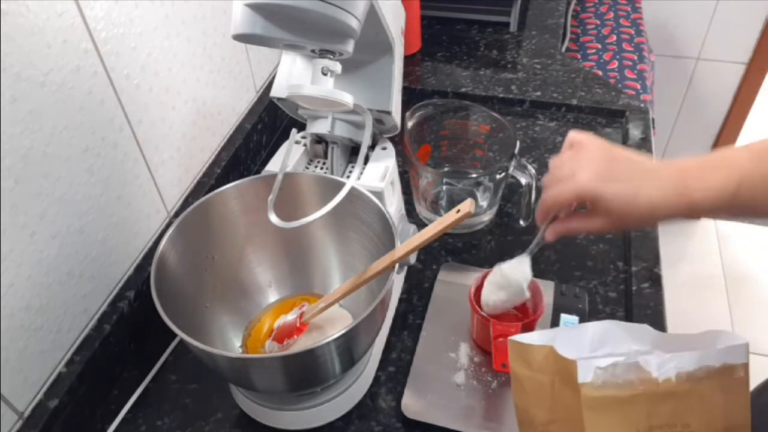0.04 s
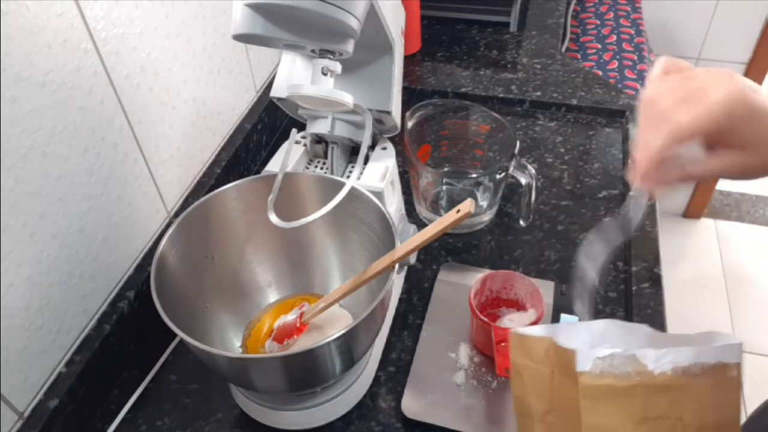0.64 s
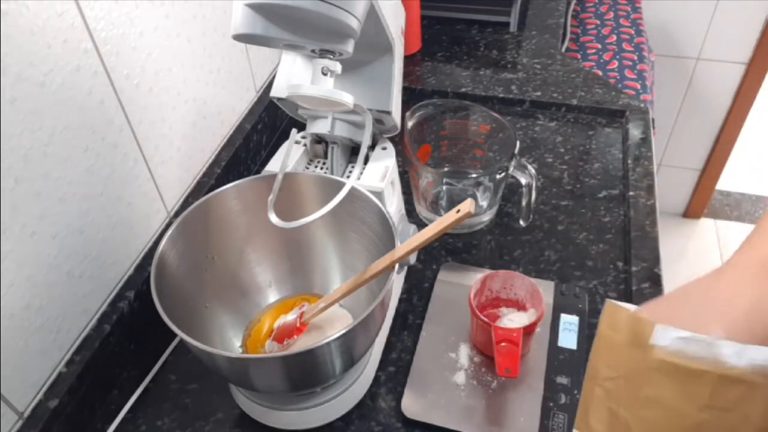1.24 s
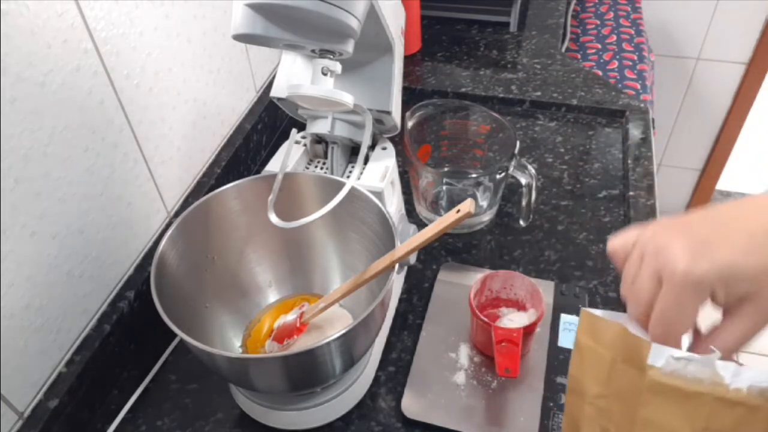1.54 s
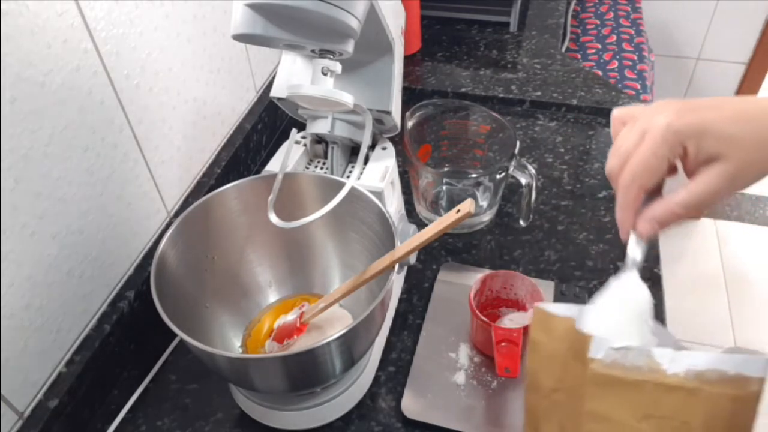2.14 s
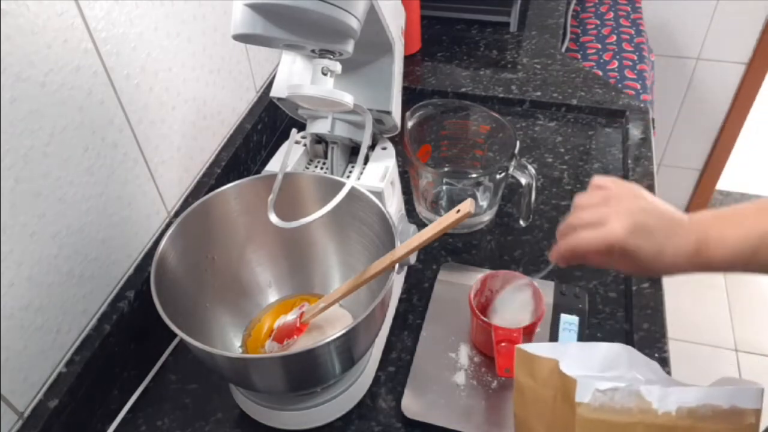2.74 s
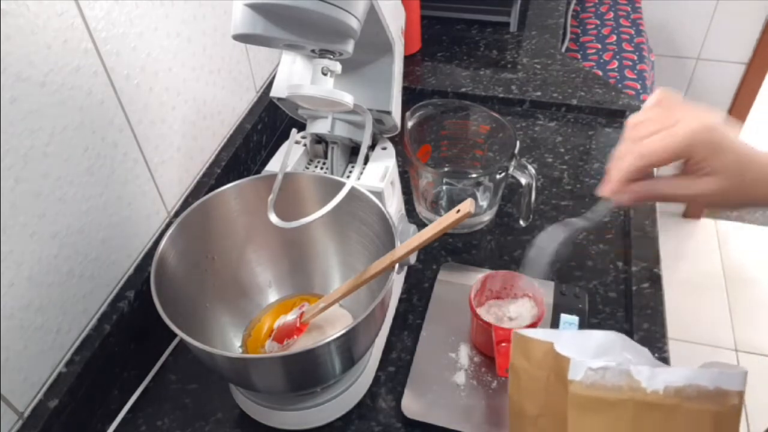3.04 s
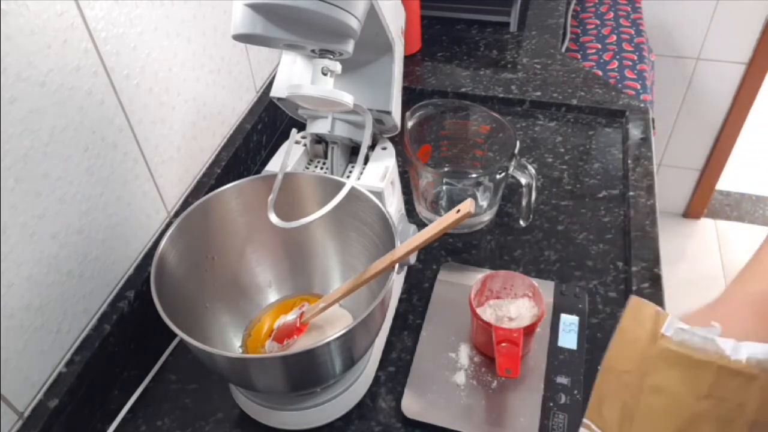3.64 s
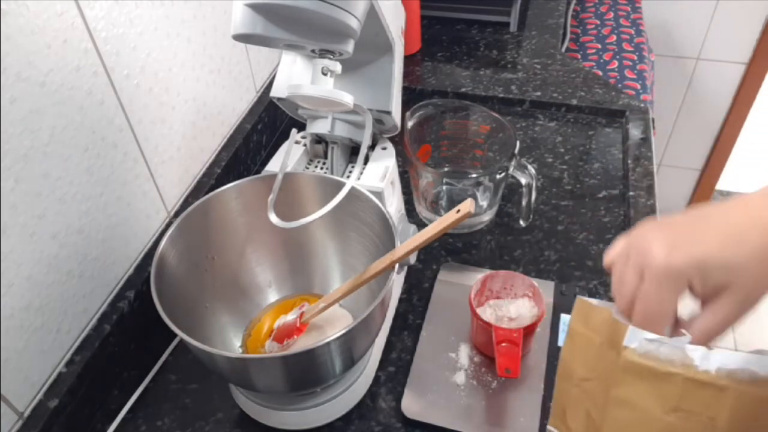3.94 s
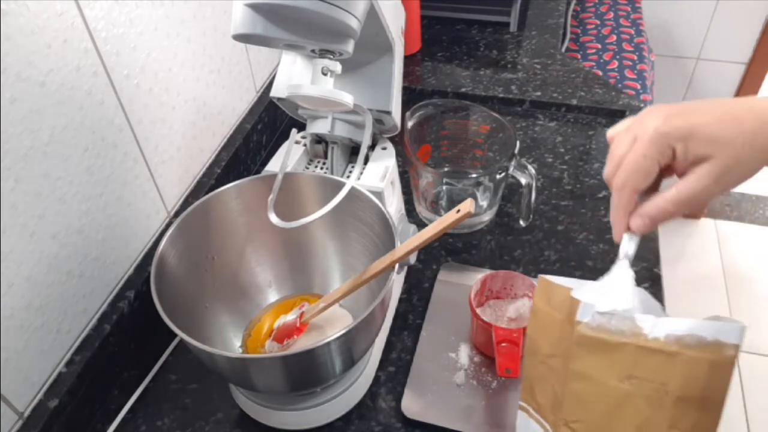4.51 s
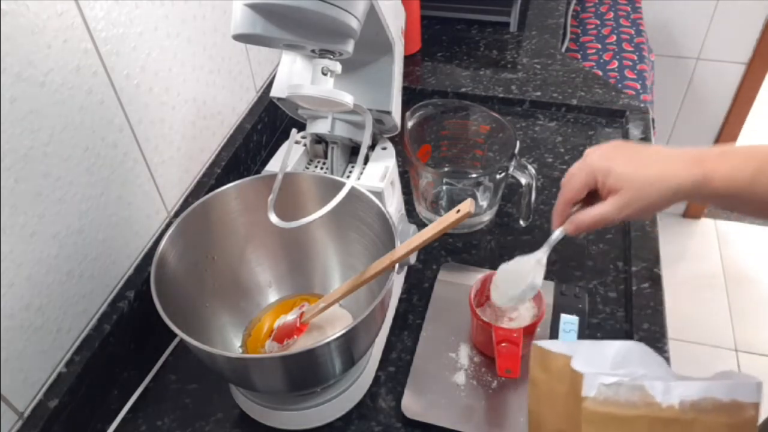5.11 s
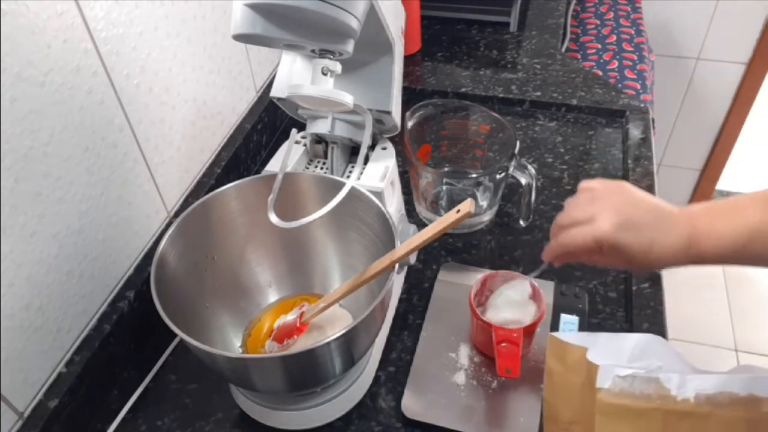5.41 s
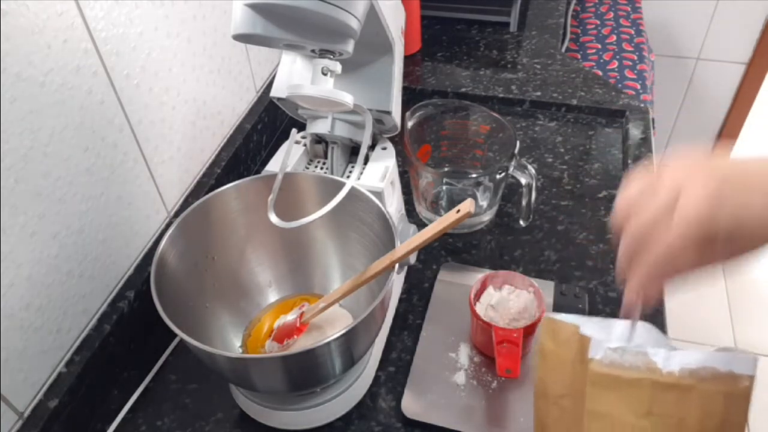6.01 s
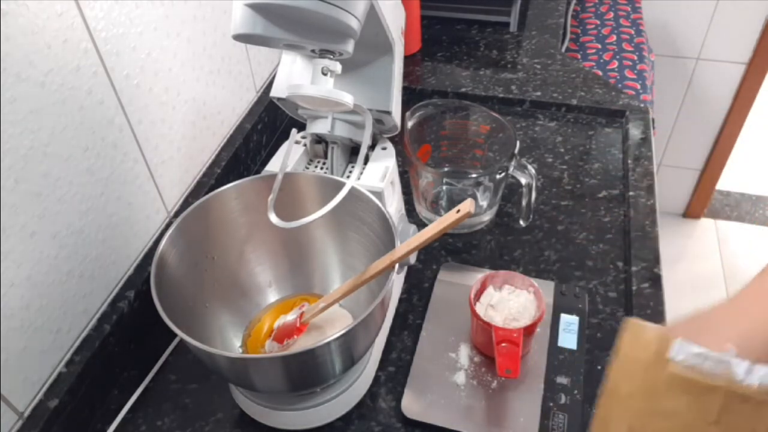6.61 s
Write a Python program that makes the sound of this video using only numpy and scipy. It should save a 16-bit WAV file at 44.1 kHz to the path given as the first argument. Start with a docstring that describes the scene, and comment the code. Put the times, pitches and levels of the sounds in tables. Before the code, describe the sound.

A quiet room rumble and faint electrical hum run throughout, in a small tiled kitchen with a short reverberation. At about 0.3 seconds a spoon knocks dully on a plastic cup as flour lands with a soft puff. From 0.9 to 1.6 seconds a hand pushes into a paper flour bag and draws out: skin hisses on paper, creases crackle and the sides pop with hollow thumps. Another soft puff of flour comes at 2.2 seconds, then a faint low swell, like a distant drone, at 3 seconds. The bag rustles and crackles again from 3.3 to about 4 seconds, settling into a lull. Near 5.5 seconds a little flour lands and the spoon touches the cup very lightly. It grazes the paper rim twice around 6 seconds, and a third crackling dip follows from 6.2 to about 6.8 seconds.

```python
"""A spoon knocks on a plastic cup on a scale and flour lands in it, over room rumble and mains hum.
A hand then dips the spoon into a paper flour bag: by stick-slip friction skin hisses and creases
crackle, while panels buckle and drum on the hollow. A soft puff of flour follows, then a faint low
swell near 300 Hz, like a distant drone, and a second dip. Flour lands again, the spoon touches the cup,
grazes the bag's rim and dips a third time. A small tiled kitchen reverberates throughout."""
import sys
import numpy as np
from scipy import signal
from scipy.fft import rfft, irfft, next_fast_len
from scipy.io import wavfile
from scipy.ndimage import map_coordinates

SR = 44100
rng = np.random.default_rng(int(sys.argv[2]) if len(sys.argv) > 2 else 0)


def unload_audio(sound):
    """Save the sound as a 16-bit wav file, at the path given as the first command line argument."""
    columns = np.transpose(np.atleast_2d(sound))
    # keep every value between -1 and 1, then stretch to whole-number steps
    steps = np.round(np.clip(columns, -1, 1) * 32767)
    wavfile.write(sys.argv[1], SR, steps.astype(np.int16))


N = 302425


def amp(db):
    """Amplitude ratio of a level in decibels."""
    return 10 ** (np.asarray(db) / 20)


def unit(x):
    """Normalisation to an rms of 1."""
    return x / np.sqrt(np.mean(x ** 2) + 1e-20)


def along(points, hz):
    """Interpolation of (Hz, value) points on a logarithmic frequency axis."""
    knots_hz, values = np.transpose(points)
    return np.interp(np.log(hz + 1), np.log(knots_hz + 1), values)


def wobble(rate):
    """Slow random modulation: a spline through `rate` knots a second."""
    knots = rng.standard_normal(int(N * rate / SR) + 4)
    return map_coordinates(knots, [np.arange(N) * rate / SR])


def coloured(x, spectrum, size=8192):
    """Minimum-phase filtering at unit energy: the spectrum sets colour only."""
    gain = amp(along(spectrum, np.fft.rfftfreq(size, 1 / SR)))
    cepstrum = irfft(np.log(gain + 1e-6))
    cepstrum[1:size // 2] *= 2
    cepstrum[size // 2 + 1:] = 0
    response = irfft(np.exp(rfft(cepstrum)))
    return signal.fftconvolve(x, response / np.linalg.norm(response))[:len(x)]


def add(track, start, sound):
    """Superposition of a sound on the track from `start` seconds."""
    remaining = track[max(round(start * SR), 0):]
    remaining[:len(sound)] += sound[:len(remaining)]


def burst(t60):
    """Exponential decay: a cluster of slips, as noise falling 60 dB in t60 seconds."""
    t = np.arange(SR // 4) / SR
    return rng.standard_normal(len(t)) * amp(-60 * t / t60)


def slips(rate, spread_db, smooth):
    """Stick-slip friction: `rate` uneven impulses a second over a share of smooth noise."""
    sizes = amp(spread_db * np.clip(rng.standard_normal(N), -2, 2)) * rng.choice([-1, 1], N)
    impulses = unit(sizes * (rng.random(N) < rate / SR))
    return unit(impulses + smooth * rng.standard_normal(N))


# The room's rumble and faint hiss. Each row: frequency in Hz, relative spectral density in dB.
RUMBLE_SPECTRUM = [(20, -46), (38, -31.5), (50, -10.5), (90, -1), (150, -7), (185, -21), (230, -6),
                   (300, -5.5), (420, -12), (470, -10.5), (720, -14), (930, -21), (1300, -29.5),
                   (2000, -38), (4000, -76)]
AIR_SPECTRUM = [(1180, -25), (2000, -14), (2220, -1.5), (3270, -7), (4360, -4.5), (5950, -9.5),
                (7130, -3.5), (8400, -8.5), (11600, -2), (15800, -8)]
# Mains hum and the kitchen's drone. Each row: frequency in Hz, rms level in dB.
HUM_TONES = [(59.5, -64), (143, -72), (298, -69)]

def background():
    """Ambient noise: broadband rumble and hiss, with tones that waver in amplitude and phase."""
    t = np.arange(N) / SR
    rumble = amp(-59 + 1.4 * wobble(4.6)) * unit(coloured(rng.standard_normal(N), RUMBLE_SPECTRUM))
    air = amp(-79.5) * coloured(rng.standard_normal(N), AIR_SPECTRUM)
    hum = np.zeros(N)
    for hz, db in HUM_TONES:
        peak = np.sqrt(2) * amp(db + 2 * wobble(4))
        hum += peak * np.sin(2 * np.pi * hz * t + .7 * wobble(5.4))
    return rumble + air + hum


# The kitchen's decay. Each row: frequency in Hz, reverberation time in seconds.
REVERB_TIMES = [(150, 0.54), (1000, 0.53), (3000, 0.52), (5500, 0.47), (9000, .42), (14000, 0.29)]

def kitchen(x, early_db, tail_db, echoes=14):
    """Reverberation: early reflections from counter and tiles, then a diffuse tail."""
    hz, t, noise = signal.stft(rng.standard_normal(SR * 3 // 4), SR, nperseg=256)
    decay = amp(-60 * t / along(REVERB_TIMES, hz)[:, None])
    tail = signal.istft(noise * decay, SR, nperseg=256)[1]
    tail *= 1 - np.exp(-np.arange(len(tail)) / SR / .008)
    early = np.zeros(len(tail))
    signs = rng.choice([-1, 1], echoes)
    delays = (rng.uniform(.002, .016, echoes) * SR).astype(int)
    early[delays] = signs / np.sqrt(echoes)
    response = amp(early_db) * early + amp(tail_db) * tail / np.linalg.norm(tail)
    return x + signal.fftconvolve(x, response)[:N]


# A dull swell, strongest near 300 Hz. Each row: frequency in Hz, relative spectral density in dB.
SWELL_SPECTRUM = [(50, -22), (120, 5), (190, -12), (300, 8.5), (410, -2.5), (520, -1), (650, -13.5),
                  (850, -9), (1150, -23), (2000, -29.5), (4000, -56)]
# Puffs of flour and, at 2.99 s, a faint swell like a distant drone.
# Each row: start in seconds, level in dB, rise time in seconds.
LOW_SWELLS = [(.25, -55, 0.034), (2.2, -57.5, 0.053), (2.99, -57.5, 0.086), (5.53, -67.5, 0.051)]

def low_swells():
    """Amplitude-modulated noise: quick swells are flour landing, the slowest is like a distant drone."""
    t, envelope = np.arange(N) / SR, np.zeros(N)
    for start, db, rise in LOW_SWELLS:
        age = np.maximum(t - start, 0) / rise
        envelope += amp(db) * age * np.exp(1 - age)
    return envelope * coloured(slips(rate=530, spread_db=4, smooth=0.8), SWELL_SPECTRUM)


# The cup's modes. Each row: frequency in Hz, relative level in dB, 60 dB decay time in seconds.
CUP_MODES = [(505, 2.5, 0.059), (541, -11, 0.079), (810, -10, 0.048), (1020, -20, 0.063)]
# The brushing spoon. Each row: frequency in Hz, relative spectral density in dB.
BRUSH_SPECTRUM = [(1500, -0.5), (3600, -7), (4300, 3), (5200, -1), (7500, 4), (10200, -8), (11500, -3),
                  (16000, -31)]
# Spoon on cup. Each row: start in seconds, knock and brush gains in dB, brush decay time in seconds.
CUP_TAPS = [(.253, -32, -68.5, 0.34), (.338, -45.5, -56.5, 0.055), (5.567, -52, -64, 0.17)]

def cup():
    """Damped modal vibration: the flour-damped cup knocks dully as the spoon brushes its wall."""
    knocks, brushes = np.zeros((2, N))
    t = np.arange(SR // 4) / SR
    ring = sum(amp(db - 60 * t / t60) * np.sin(2 * np.pi * hz * t) for hz, db, t60 in CUP_MODES)
    ring *= 1 - np.exp(-t / 0.0026)
    for start, knock_db, brush_db, brush_t60 in CUP_TAPS:
        add(knocks, start, amp(knock_db) * ring)
        onset = 1 - np.exp(-20 * t / brush_t60)
        add(brushes, start, amp(brush_db) * burst(brush_t60) * onset)
    return knocks + coloured(brushes, BRUSH_SPECTRUM)


# The bag's scraped rim. Each row: frequency in Hz, relative spectral density in dB.
RIM_SPECTRUM = [(200, -15), (480, 8), (600, 3), (800, 13), (1100, -2.5), (1900, -2), (2400, -1), (2900, -7),
                (4000, -2), (4700, -9.5), (7500, -10), (9300, -13), (12500, -11.5), (16000, -13.5)]
# Spoon on rim. Each row: start in seconds, level in dB, length in seconds.
RIM_GRAZES = [(5.974, -51, 0.025), (6.083, -49, 0.028)]

def grazes(release_t60=0.104):
    """Sliding friction: steel scrapes briefly and lightly on the paper rim."""
    t, contact = np.arange(N) / SR, np.zeros(N)
    for start, db, length in RIM_GRAZES:
        contact += amp(db - 60 * np.maximum(t - start - length, 0) / release_t60) * (t > start)
    return contact * coloured(slips(rate=900, spread_db=4, smooth=0.79), RIM_SPECTRUM)


def stroke(start, length, db, swell_db, attack_s, release_t60):
    """Amplitude envelope of one hand movement: attack, a hold that swells or fades, release."""
    age = np.arange(N) / SR - start
    progress = np.clip(age / length, 0, 1)
    onset = np.clip(1 + age / attack_s, 0, 1) ** 2
    release_db = 60 * np.maximum(age - length, 0) / release_t60
    return onset * amp(db + swell_db * (progress - .5) - release_db)


# The hand shoves in. Each row: start and length in seconds, then level, swell and relative flap in dB.
HAND_PUSHES = [(0.885, 0.069, -45, 4.5, 3.5), (0.972, 0.028, -37.5, -2.5, -3.5), (1.058, .07, -43, 2.5, -1),
               (3.303, 0.036, -49, 2.5, -0.5), (3.368, 0.078, -40, 4.5, -2), (3.508, 0.1, -45, 0, 5),
               (6.176, 0.13, -44, -3.5, -1.5), (6.352, 0.09, -45, 7, 0.5)]
# The hand draws out. Each row: start and length in seconds, then level, swell, relative flex
# and relative hiss in dB.
HAND_PULLS = [(1.191, 0.34, -48.5, 1, 5.5, -5), (3.725, 0.23, -51.5, 8, 0, -2.5),
              (6.592, .225, -52.5, 10.5, 3, -2.5)]

def hand_envelopes(sway_db=-54, sway_t60=1.68):
    """Forced, then free motion: pushes pump the hollow, pulls drag the panels and leave them swaying."""
    flap, flex, crackle, slide = np.zeros((4, N))
    for start, length, db, swell_db, flap_db in HAND_PUSHES:
        push = stroke(start, length, db, swell_db, attack_s=0.0078, release_t60=0.28)
        flap += amp(flap_db) * push
        flex += amp(3) * push
        crackle += push
        slide += amp(-6.5) * push
    for start, length, db, swell_db, flex_db, hiss_db in HAND_PULLS:
        pull = stroke(start, length, db, swell_db, attack_s=0.041, release_t60=0.22)
        free_time = np.maximum(np.arange(N) / SR - start - length, 0)
        sway = amp(sway_db - 60 * free_time / sway_t60) * (1 - np.exp(-free_time / 0.027))
        flap += amp(-3) * pull + sway
        flex += amp(flex_db) * pull + sway
        crackle += pull + amp(-25) * sway  # creases relax as the bag sways
        slide += amp(hiss_db) * pull
    return flap, flex, crackle, slide


def shifting(x, depth_db, width_hz, hold_s, size=512):
    """Time-varying filtering: resonances come and go as the paper changes shape."""
    spectra = signal.stft(x, nperseg=size)[2]
    rows = np.arange(spectra.shape[0]) * SR / size / width_hz
    cols = np.arange(spectra.shape[1]) * size / 2 / SR / hold_s
    grid = np.meshgrid(rows, cols, indexing="ij")
    field = map_coordinates(rng.standard_normal((size, size)), grid, order=1, mode="wrap")
    return unit(signal.istft(spectra * amp(depth_db * unit(field)), nperseg=size)[1][:N])


# The air in the bag, flexing panels, crackling creases and skin sliding on paper fibres.
# Each row: frequency in Hz, relative spectral density in dB.
HOLLOW_SPECTRUM = [(45, -26.5), (80, -9.5), (112, 1), (165, -8.5), (225, 0.5), (260, -5.5), (310, 1.5),
                   (400, -9), (700, -35.5)]
PANEL_SPECTRUM = [(200, -23.5), (380, -5.5), (430, -8), (515, -0.5), (610, -7.5), (780, 3), (880, 0),
                  (970, -10), (1200, -9), (2000, -24), (4000, -61.5)]
CREASE_SPECTRUM = [(500, -37), (1100, -10), (1600, 2), (2700, 2), (4200, -2), (7000, -7), (10000, -24.5),
                   (16000, -42.5)]
FIBRE_SPECTRUM = [(2000, -29), (5000, -10), (7500, 2), (9300, -2.5), (12500, 2.5), (16000, -1.5)]

def rustle():
    """Frictional excitation: the hand drags in jerks, driving hollow, panels, creases and skin hiss."""
    flap, flex, crackle, slide = hand_envelopes()
    jerks = wobble(45)
    hollow = coloured(slips(rate=300, spread_db=2.5, smooth=0.4), HOLLOW_SPECTRUM)
    panels = coloured(slips(rate=600, spread_db=4.5, smooth=0.46), PANEL_SPECTRUM)
    panels = shifting(panels, depth_db=3.5, width_hz=130, hold_s=.07)
    creases = coloured(slips(rate=1300, spread_db=3, smooth=0.81), CREASE_SPECTRUM)
    creases = shifting(creases, depth_db=3, width_hz=239, hold_s=.05)
    hiss = coloured(slips(rate=3400, spread_db=2.5, smooth=0.93), FIBRE_SPECTRUM)
    hiss = shifting(hiss, depth_db=1.7, width_hz=310, hold_s=0.044)
    return (amp(-0.5 + 1.3 * jerks) * flap * hollow
            + amp(-1.5 + 0.87 * jerks) * (flex * panels + crackle * creases)
            + amp(1 + 0.71 * jerks) * slide * hiss)


# Hollow and panel modes. Each row: frequency in Hz, relative level in dB, 60 dB decay time in seconds.
BAG_MODES = [(119, -10, 0.12), (227.7, -11.5, 0.045), (308.4, -8.5, 0.034), (386, -7.5, 0.035),
             (527.7, -5, 0.057), (550.5, -7, 0.014), (700, -1, 0.033), (754, -3.5, 0.023),
             (961, -3.5, 0.033), (1210, 0.5, 0.0147), (1540, 1.5, 0.017)]

def thump(centre_hz):
    """Modal excitation: a broad panel drives the bag's low modes, a small one its high modes."""
    t = np.arange(SR // 4) / SR
    hz, mode_db, t60 = np.transpose(BAG_MODES)[:, :, None]
    # the bag has a new shape at every pop, so its modes shift
    shift, strength, phase = rng.standard_normal((3, len(BAG_MODES), 1))
    shifted_hz = hz * np.exp(0.077 * shift)
    drive_db = 2 * strength - 9.5 * np.abs(np.log2(hz / centre_hz))
    modes = amp(mode_db + drive_db - 60 * t / t60) * np.sin(2 * np.pi * (shifted_hz * t + phase))
    onset = 1 - np.exp(-t / 0.0023)  # the fold takes a moment to cross the panel
    return unit(modes.sum(axis=0) * onset)


# A snapping crease. Each row: multiple of its centre frequency, relative spectral density in dB.
SNAP_SPECTRUM = [(.1, -36), (.4, -3.5), (.75, -2), (1.149, -1), (1.599, -6), (2.2, -19), (4, -31.5)]
# Panels popping over. Each row: start in seconds, relative thump level in dB, thump centre in Hz,
# relative snap level in dB, snap centre in Hz.
PANEL_BUCKLES = [(0.95, -27.5, 406, -37, 3400), (0.9739, -20, 607, -21.5, 3940),
                 (1.061, -24.5, 517, -29, 3066), (1.1109, -26.5, 490, -16.5, 3430),
                 (1.1175, -31, 560, -19, 3720), (1.198, -28.5, 450, -25.5, 2293),
                 (1.2205, -28, 704, -22.5, 2480), (1.346, -25.5, 352, -40, 2303),
                 (1.3877, -24.5, 690, -41, 1880), (1.596, -39.5, 670, -50.5, 2610),
                 (3.3811, -30, 348, -32, 6050), (3.55, -23, 740, -34, 3360),
                 (3.8051, -49, 570, -30.5, 3340), (3.8682, -28, 620, -65, 3000),
                 (3.8979, -22.5, 686, -23.5, 2240), (3.91, -22, 660, -35.5, 2190),
                 (3.95, -33.5, 640, -30.5, 2860), (4.0191, -30.5, 600, -44.5, 2330),
                 (6.1853, -26.5, 483, -26, 6120), (6.195, -22.5, 350, -32.5, 3600),
                 (6.3455, -27.5, 567, -50, 2383), (6.68, -37.5, 200, -64, 2500),
                 (6.7217, -20, 610, -29, 2290)]

def buckles(tick_ref_hz=2930, tick_db_per_octave=15):
    """Snap-through buckling: a panel pops over, the bag thumps, a crease snaps and the fibres tick."""
    thumps, snaps, ticks = np.zeros((3, N))
    for start, thump_db, thump_hz, snap_db, snap_hz in PANEL_BUCKLES:
        add(thumps, start, amp(thump_db - 21.5) * thump(thump_hz))
        crease = [(snap_hz * ratio, db) for ratio, db in SNAP_SPECTRUM]
        add(snaps, start, amp(snap_db - 26) * unit(coloured(burst(t60=0.026), crease)))
        # a tight, high crease ticks louder
        tick_db = snap_db - 19.5 + tick_db_per_octave * np.log2(snap_hz / tick_ref_hz)
        add(ticks, start, amp(tick_db) * burst(t60=0.025))
    return thumps + snaps + coloured(ticks, FIBRE_SPECTRUM)


def scene():
    """Superposition: bag, cup and low swells reverberate in the kitchen over its ambient noise."""
    direct = rustle() + buckles() + grazes() + cup() + low_swells()
    return (kitchen(direct, early_db=-11, tail_db=-8) + background())[None]


def record(dry, cutoff_hz=15900):
    """Band limiting: an ideal low-pass filter passes nothing above the cutoff."""
    size = next_fast_len(N + SR // 2)
    passband = np.fft.rfftfreq(size, 1 / SR) < cutoff_hz
    return irfft(rfft(dry, size) * passband, size)[..., :N]


dry = scene()
out = record(dry)
unload_audio(out)
```